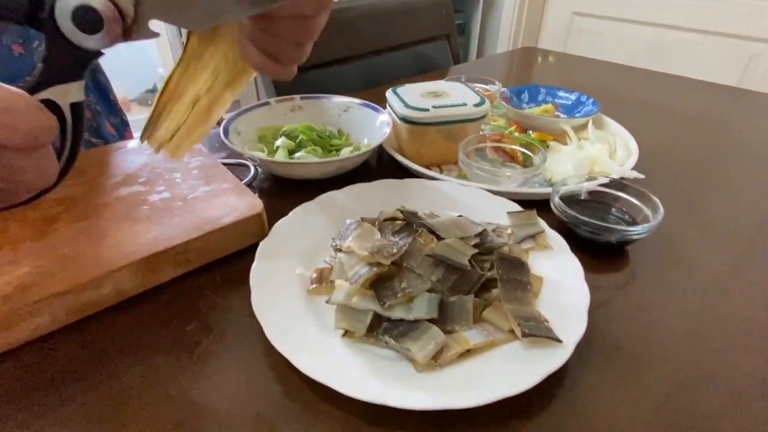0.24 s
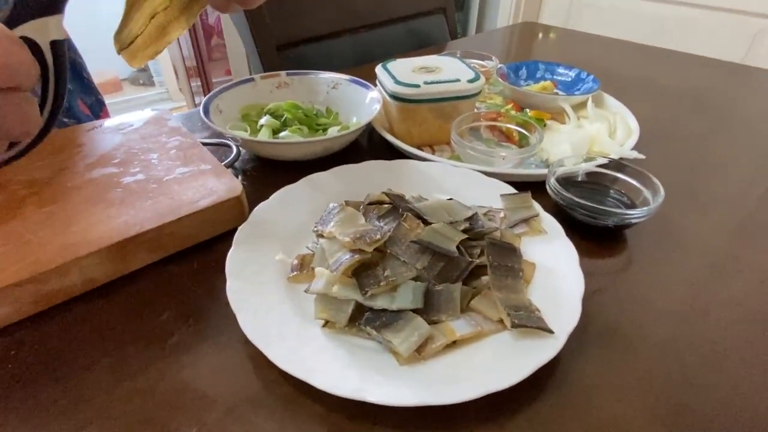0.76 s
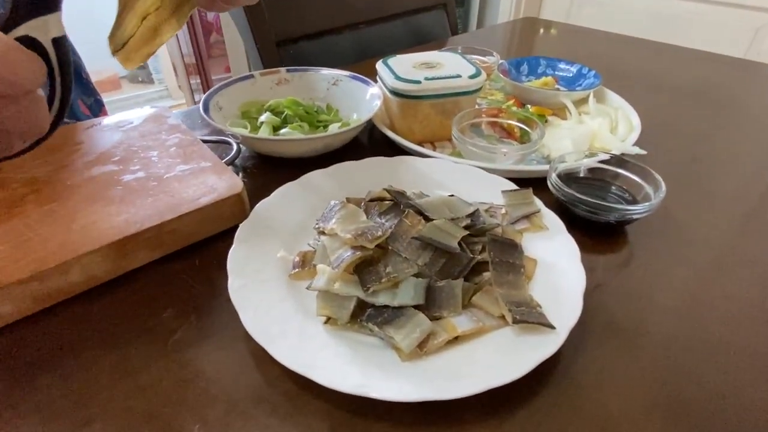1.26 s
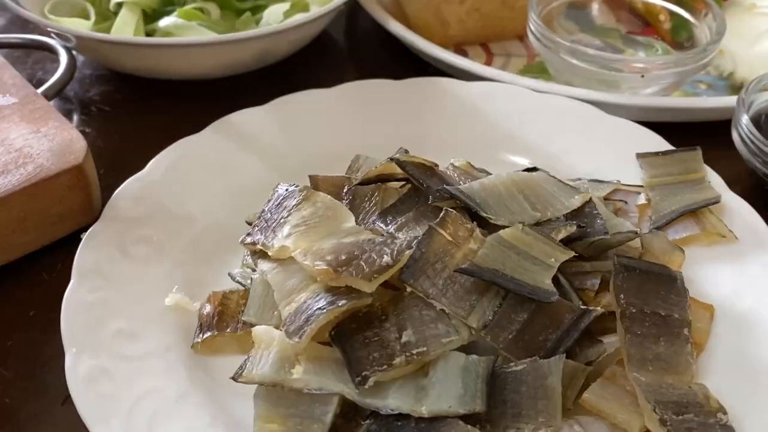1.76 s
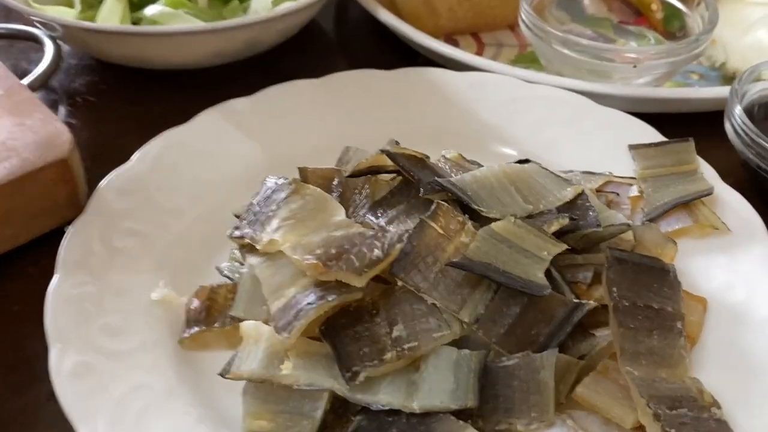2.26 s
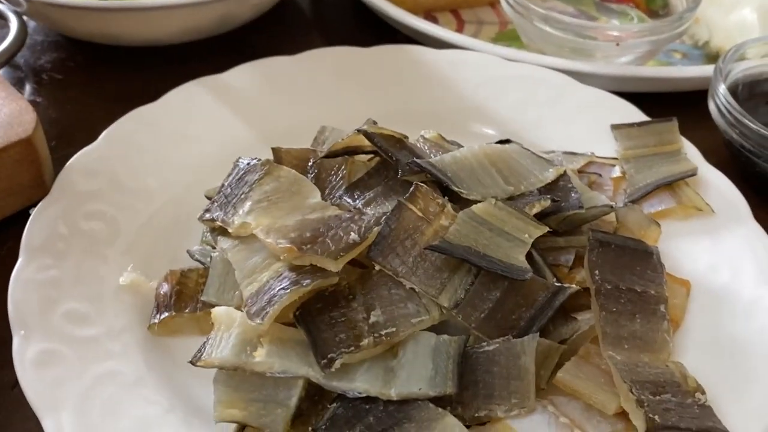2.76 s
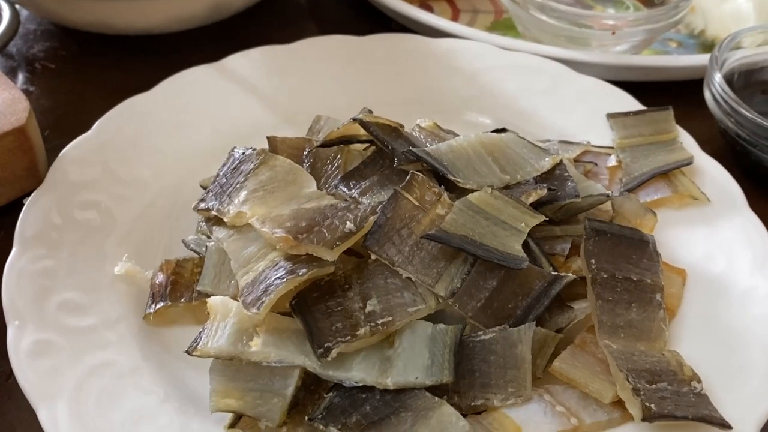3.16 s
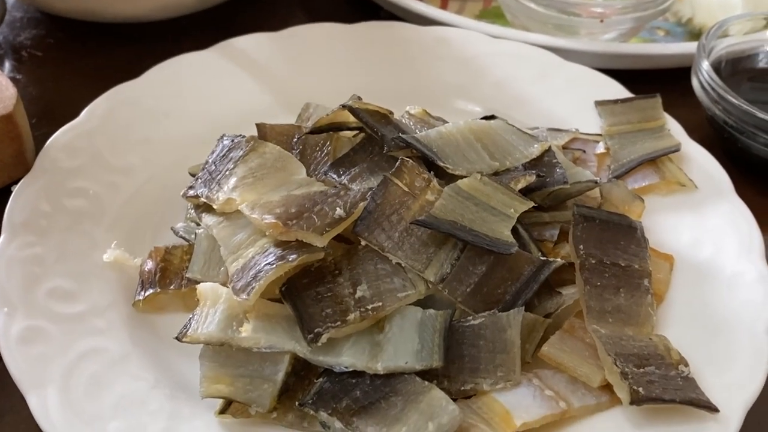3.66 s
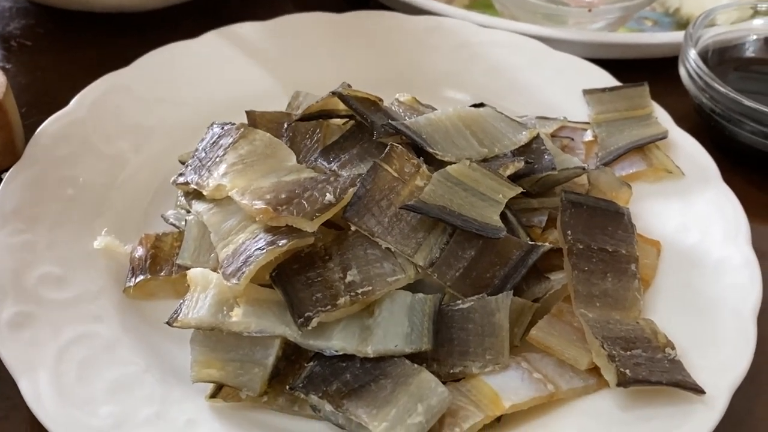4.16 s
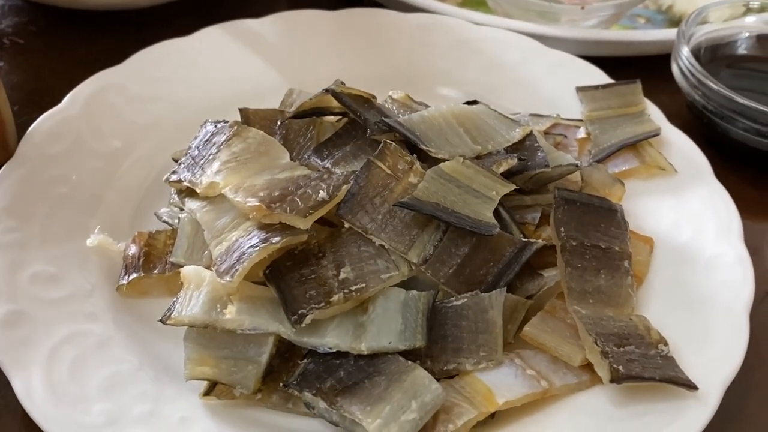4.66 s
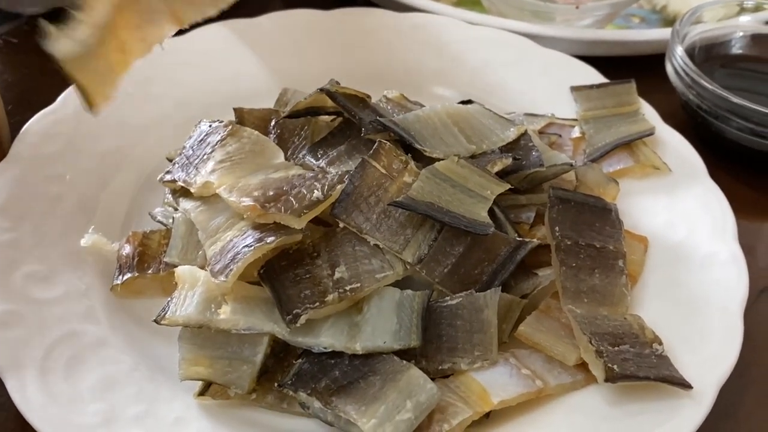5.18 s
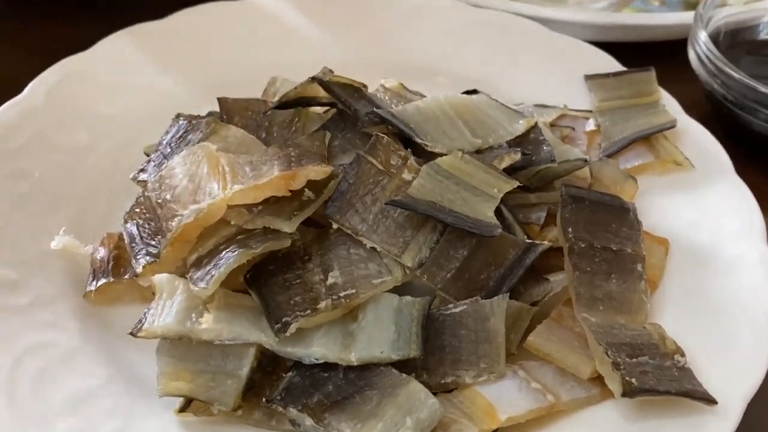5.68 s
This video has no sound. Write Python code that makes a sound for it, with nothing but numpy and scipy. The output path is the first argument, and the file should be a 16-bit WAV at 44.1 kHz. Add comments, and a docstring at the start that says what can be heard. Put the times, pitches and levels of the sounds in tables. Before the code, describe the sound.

Scissors cut dried fish with sharp snaps, steel ticks and plastic handle clacks in a small kitchen, amid dull handling thumps.

```python
"""Kitchen scissors cut tough dried fish in a small, live kitchen; an appliance hums throughout.
First, fingers bump and tap the case of the hand-held microphone, as they do on and off later.
The blades tick faintly near 1 s; from 1.5 s they rasp along each other and tick. Between 2 and 4 s
the fish gives way in five snaps, amid clacks of the shutting handles and a ping of freed steel.
More strokes and two faint pings follow; the handles clack shut a last time at 5.5 s."""
import sys
import numpy as np
from scipy import signal
from scipy.fft import rfft, irfft
from scipy.io import wavfile

SR = 44100
rng = np.random.default_rng(int(sys.argv[2]) if len(sys.argv) > 2 else 0)


def dump(signal):
    """Clip the signal to [-1, 1] and save it as 16-bit WAV at the path in sys.argv[1]."""
    limited = np.clip(np.atleast_2d(signal).T, -1, 1)
    pcm = np.round(limited * 32767).astype(np.int16)
    wavfile.write(sys.argv[1], SR, pcm)


N = 261365
TIME_S = np.arange(N) / SR
HIT_S = TIME_S[:SR // 8]
IMPULSE = HIT_S == 0

# soft bumps on the microphone case: start_s, push_db, contact_s
BUMPS = [(0.246, -10.5, 0.013), (0.45, -13, 0.007), (0.493, -9.5, 0.0068), (0.686, -4.5, 0.013),
         (0.965, -11, 0.018), (1.301, -12, 0.012), (1.784, -15.5, 0.013), (2.234, -5, 0.013),
         (2.439, -21, .005), (2.465, -16, 0.02), (3.441, -18, 0.0036), (4.571, -21, 0.013),
         (4.718, -19, 0.016), (5.221, -17, 0.015), (5.527, -18.5, 0.0079)]
# blade-on-blade strokes: start_s, length_s, rasp_db, whistle_db, start_hz, end_hz
STROKES = [(1.483, 0.16, -71, -72, 7150, 9300), (1.595, 0.12, -62.5, -65, 9400, 10760),
           (1.922, 0.21, -65, -50, 5820, 7270), (2.157, 0.22, -68.5, -85, 6650, 7600),
           (2.764, 0.2, -66.5, -67, 7300, 8400), (3.527, .24, -55.5, -55, 8570, 11700),
           (3.981, 0.26, -59.5, -52, 6400, 9200), (4.289, .06, -72, -80, 7600, 7650),
           (4.583, 0.1, -69, -60.5, 7100, 7930), (4.666, 0.16, -60.5, -53.5, 8400, 11660),
           (4.706, 0.21, -64.5, -61, 13300, 14100), (5.158, 0.075, -71, -60, 8040, 8800)]
# spectrum of grinding edges and parting skin: freq_hz, density_db
RASP_SPECTRUM = [(800, -21), (2400, -7), (4000, -19.5), (5600, -11), (8000, -14.5), (10000, -22),
                 (13000, -20), (15500, -33), (17000, -34)]
# handles shutting: start_s, level_db, treble_db, rattle_t60_s
CLACKS = [(1.794, -22.5, -2, 0.051), (2.659, -22.5, 6, 0.07), (3.4022, -22.5, 7.5, 0.036),
          (3.4274, -18.5, 1, 0.043), (5.518, -17, -1.5, 0.043)]


def amp(db):
    """Decibels to gain."""
    return 10 ** (np.asarray(db) / 20)


def rms_one(x):
    """Scale to rms 1."""
    return x / np.sqrt(np.mean(x ** 2) + 1e-20)


def peak_one(x):
    """Scale to peak 1."""
    return x / np.max(np.abs(x))


def at_hz(points, hz):
    """Read a table on a log-frequency axis."""
    freq_hz, value = np.transpose(points)
    return np.interp(np.log(np.maximum(hz, 1)), np.log(freq_hz), value)


def cut(x, hz, kind, order=2):
    """Causal Butterworth filter."""
    sos = signal.butter(order, np.minimum(hz, .48 * SR), kind, fs=SR, output="sos")
    return signal.sosfilt(sos, x + 1e-18)


def shelf(x, hz, db, kind):
    """First-order low or high shelf."""
    return x + (amp(db) - 1) * cut(x, hz, kind, order=1)


def colour(x, spectrum):
    """Filter by a table of freq_hz, gain_db."""
    return irfft(rfft(x) * amp(at_hz(spectrum, np.fft.rfftfreq(len(x), 1 / SR))), len(x))


def drift(rate_hz):
    """Random line segments, rms 1."""
    knots = rng.standard_normal(int(rate_hz * N / SR) + 2)
    return rms_one(np.interp(TIME_S * rate_hz, np.arange(len(knots)), knots))


def resonate(x, modes):
    """Parallel resonators of alternating sign: freq_hz, width_hz, gain_db."""
    out = 0
    for k, (hz, width_hz, db) in enumerate(modes):
        r = np.exp(-np.pi * width_hz / SR)
        feedback = [1, -2 * r * np.cos(2 * np.pi * hz / SR), r * r]
        out = out + (-1) ** k * amp(db) * (1 - r * r) / 2 * signal.lfilter([1, 0, -1], feedback, x + 1e-18)
    return out


def decay(t, t60_s):
    """Exponential decay."""
    return np.exp(-np.log(1000) * t / np.maximum(t60_s, 1e-3))


def contact(rattle, t60_s):
    """An impulse and a dying rattle of micro-contacts."""
    return IMPULSE + rattle * rng.standard_normal(len(HIT_S)) * decay(HIT_S, t60_s)


def add(track, start_s, sound):
    """Mix a sound in."""
    i = max(int(start_s * SR), 0)
    track[i:i + len(sound)] += sound[:N - i]


def kitchen(x, build_s):
    """Diffuse reflections build up, then die soonest in the treble."""
    spectrum = [(100, -16.5), (300, -2.5), (500, -3), (700, 0.5), (1000, 3.5), (1400, -6.5), (2500, -7),
                (4000, -3), (7000, -5), (10000, -5), (13000, -7), (16000, -14)]  # reflections: freq_hz, gain_db
    reverb_times = [(150, 0.95), (500, 0.27), (1100, 0.47), (3500, 0.42), (7000, 0.38), (14000, 0.11)]  # room decay: freq_hz, t60_s
    t = TIME_S[:int(.7 * SR)]
    bins = rfft(colour(rng.standard_normal(len(t)), spectrum))
    hz = np.fft.rfftfreq(len(t), 1 / SR)
    edges_hz = np.geomspace(60, SR / 2, 16)
    tail = 0
    for low, high in zip(edges_hz, edges_hz[1:]):
        band = irfft(bins * (hz >= low) * (hz < high), len(t))
        tail += band * decay(t, at_hz(reverb_times, np.sqrt(low * high)))
    return signal.fftconvolve(x, tail * (1 - np.exp(-t / build_s)))[:N] * amp(-35)


def room_air():
    """Steady low room noise and a faint hiss."""
    air_spectrum = [(59, -60.5), (100, -8), (174, 0.5), (298, -3.5), (329, -1), (359, -4.5), (397, -4),
                    (510, -12), (578, -9.5), (647, -15), (707, -16), (791, -6.5), (2000, -26.5),
                    (2600, -62), (4400, -120)]  # room noise: freq_hz, density_db
    hiss_spectrum = [(1500, 1), (2100, -3.5), (2700, -5.5), (3600, -7.5), (4600, -10.5), (5400, -8),
                     (6300, -18.5), (7600, -12.5), (9000, -22), (13000, -18), (16000, -53.5)]  # hiss: freq_hz, density_db
    air = colour(rng.standard_normal(N), air_spectrum)
    air = cut(cut(air, 80, "high"), 1400, "low", order=4)
    hiss = colour(rng.standard_normal(N), hiss_spectrum)
    return amp(-57.5) * rms_one(air) + amp(-72.5) * rms_one(hiss)


def appliance_hum():
    """Four tones, each wavering in phase."""
    tones = [(329, -65.5), (405, -71), (571.5, -67), (695, -70)]  # hum partials: pitch_hz, rms_db
    return sum(amp(db) * np.sqrt(2) * np.sin(2 * np.pi * hz * TIME_S + 0.53 * drift(6.4))
               for hz, db in tones)


def hand_rumble():
    """The holding hand never rests, and takes a moment to settle after each bump."""
    unrest = [(0.0, -35), (0.48, -38), (1.1, -50), (1.68, -40), (2.23, -30), (4.16, -40), (5.64, -41.5),
              (5.93, -48)]  # rumble envelope: time_s, level_db
    spectrum = [(12, 3), (25, 2.5), (45, -4), (70, -11), (100, -26.5), (200, -38.5)]  # handling noise: freq_hz, density_db
    level = amp(np.interp(TIME_S, *np.transpose(unrest)) + 1)
    for start_s, push_db, _ in BUMPS:
        add(level, start_s, amp(push_db - 21) * decay(TIME_S[:SR], t60_s=0.44))
    return cut(level * rms_one(colour(rng.standard_normal(N), spectrum)), 310, "low", order=4)


def case_bumps():
    """A soft push swings the case slowly and stirs its low modes; longer contacts ring less."""
    case_modes = [(66, 34, 11.5), (111, 32, 6), (161.5, 33.5, 17.5), (358, 75, 1)]  # microphone case: freq_hz, width_hz, gain_db
    soften_db_per_s = 501
    out, t = np.zeros(N), TIME_S[:SR // 3]
    for start_s, push_db, contact_s in BUMPS:
        push = np.sin(np.pi * np.minimum(t / contact_s, 1)) ** 2
        swing = peak_one(resonate(push, [(23.96, 10.4, 5.5), (70.3, 17.6, -1.5), (142, 100, -15.5)]))
        stir = rng.standard_normal(len(t)) * decay(t, t60_s=0.081)
        ring = peak_one(cut(resonate(stir, case_modes), 850, "low"))
        add(out, start_s, amp(push_db - 2.5) * (swing + amp(-11 - soften_db_per_s * contact_s) * ring))
    return out


def finger_taps():
    """Fingers click dryly on the case with a short, hollow ring near 1 kHz."""
    taps = [(0.2577, -33.5, -6), (.491, -35, -16.5), (.499, -30, -21), (0.511, -33.5, -17.5),
            (.685, -35, -31), (0.703, -41, -13), (.9665, -33.5, -5), (1.004, -38.5, -17), (1.305, -27, -13),
            (1.940, -30, -2.5), (2.240, -40.5, -5), (4.615, -45.5, 15)]  # finger clicks: start_s, peak_db, treble_db
    shell_modes = [(1, 260, 0), (1.25, 400, -8), (2.2, 1200, -14), (4.1, 1800, -14)]  # tapped case: pitch_ratio, width_hz, gain_db
    out = np.zeros(N)
    for start_s, peak_db, treble_db in taps:
        pitch_hz = 966 * (1 + 0.077 * rng.standard_normal())
        modes = [(pitch_hz * ratio, width_hz, db) for ratio, width_hz, db in shell_modes]
        click = resonate(contact(rattle=0.046, t60_s=0.035), modes)
        treble = cut(cut(click, 1600, "high"), 6400, "low", order=4)
        add(out, start_s, amp(peak_db) * peak_one(cut(click, 1400, "low") + amp(treble_db - 6) * treble))
    return out


def closing(time_s, start_s, length_s):
    """Blade speed and travel, both 0-1, in a stroke that speeds up and slows again."""
    angle = np.pi * np.clip((time_s - start_s) / length_s, 0, 1)
    return np.abs(np.sin(angle)), (1 - np.cos(angle)) / 2


def blade_hz(time_s):
    """Blade pitch, rising with the travel of the nearest stroke."""
    nearest = min(STROKES, key=lambda row: abs(row[0] + row[1] / 2 - time_s))
    start_s, length_s, _, _, start_hz, end_hz = nearest
    return start_hz + (end_hz - start_hz) * closing(time_s, start_s, length_s)[1]


def blade_rasp():
    """Edges grind in tiny slips; a rough whistle rises as the crossing point runs to the tips."""
    grind, whistle = np.zeros((2, N))
    slips = amp(4 * drift(450))
    grains = rms_one(colour(rng.standard_normal(N) * slips, RASP_SPECTRUM))
    roughness = rms_one(cut(rng.standard_normal(N) * slips, 600, "low"))
    for start_s, length_s, rasp_db, whistle_db, start_hz, end_hz in STROKES:
        speed, travel = closing(TIME_S, start_s, length_s)
        level = speed ** 2.2
        wander_hz = 330 * drift(45)  # stick and slip
        pitch_hz = start_hz + (end_hz - start_hz) * travel + wander_hz
        grind += amp(rasp_db) * level * grains
        whistle += amp(whistle_db) * level * roughness * np.sin(2 * np.pi * np.cumsum(pitch_hz) / SR)
    return (grind + whistle) * amp(2.5 * drift(90) - 3.5)


def blade_ticks():
    """An edge catches and slips: a bright click, and a brief ring pitched by where the blades cross."""
    hard_catches = [(.927, -52), (.994, -43), (1.97, -43), (1.9783, -32.5), (2.0196, -29.5), (2.034, -38),
                    (2.0623, -33), (2.2784, -51), (2.4213, -47.5), (2.866, -39.5), (2.9308, -44),
                    (3.087, -51), (3.4265, -44), (4.024, -43), (4.0621, -46), (4.093, -37), (4.125, -44),
                    (4.1355, -34.5), (4.99, -52.5), (5.208, -35), (5.23, -32.5), (5.878, -36.5)]  # steel edges catching: start_s, level_db
    pressed_modes = [(.37, 600, -15), (.7, 900, -6), (1, 1300, 0), (1.5, 3000, -10)]  # blades pressed together: pitch_ratio, width_hz, gain_db
    faint_catches = [(start_s + length_s * rng.beta(2, 2), rasp_db + 13 + rng.standard_normal())
                     for start_s, length_s, rasp_db, *_ in STROKES for _ in range(3)]
    direct, to_room = np.zeros((2, N))
    for start_s, level_db in hard_catches + faint_catches:
        slip = contact(rattle=0.9, t60_s=0.0098)
        modes = [(blade_hz(start_s) * ratio, width_hz, db) for ratio, width_hz, db in pressed_modes]
        click = peak_one(cut(cut(slip, 4970, "high"), 6260, "low"))
        ring = amp(-15.5) * peak_one(resonate(slip, modes))
        add(direct, start_s, amp(level_db) * (click + ring))
        add(to_room, start_s, amp(level_db) * (amp(-3) * click + amp(-0.5) * ring))
    return direct, to_room


def blade_pings():
    """The blades spring free with a click and ring."""
    pings = [(3.171, -19, -14.5), (4.18, -35.5, -11), (4.363, -43.5, -8)]  # blade releases: start_s, level_db, click_db
    free_modes = [(2550, 250, -9), (5100, 1200, -13), (6700, 380, 2), (7250, 400, -2)]  # free blades: freq_hz, width_hz, gain_db
    direct, to_room = np.zeros((2, N))
    ring = peak_one(resonate(IMPULSE, free_modes))
    for start_s, level_db, click_db in pings:
        click = amp(click_db) * peak_one(cut(contact(rattle=0.7, t60_s=0.021), [2500, 12000], "band"))
        add(direct, start_s, amp(level_db) * (click + ring))
        add(to_room, start_s, amp(level_db) * (amp(-1) * click + amp(1.5) * ring))
    return direct, to_room


def handles(force, q=3.5):
    """Response of the heavily damped plastic handles, peak 1."""
    modes = [(180, -1.5), (450, 2.5), (820, 3), (1080, 3), (1650, -0.5), (2200, -2), (2850, -5),
             (4600, -13), (6800, -21.5), (11500, -34.5)]  # handle resonances: freq_hz, gain_db
    return peak_one(cut(resonate(force, [(hz, hz / q, db) for hz, db in modes]), 6300, "low"))


def handle_clacks():
    """The handles meet and chatter; a longer chatter feeds the room more."""
    direct, to_room = np.zeros((2, N))
    body = handles(IMPULSE)
    for start_s, level_db, treble_db, t60_s in CLACKS:
        knock = handles(contact(rattle=0.45, t60_s=t60_s))
        radiated = amp(8.5) * (t60_s / 0.061) ** 0.33 * body
        for track, sound in (direct, knock), (to_room, radiated):
            warmed = shelf(sound, 1100, 1.2, "low")
            add(track, start_s, amp(level_db) * shelf(warmed, 3750, treble_db, "high"))
    return direct, to_room


def fish_bites():
    """Fibres part in a dense burst, bright in the skin, dull in the flesh; each clack crushes a few."""
    bites = [(1.914, 0.045, -60), (2.723, 0.037, -53.5), (5.217, 0.041, -47)]  # blades entering tough skin: start_s, length_s, level_db
    crushes = [(start_s, 0.044, level_db - 36) for start_s, level_db, *_ in CLACKS]
    out = np.zeros(N)
    for start_s, length_s, level_db in bites + crushes:
        fibres = rng.standard_normal(len(HIT_S)) * amp(11.5 * rng.standard_normal(len(HIT_S)))
        skin = rms_one(colour(fibres, RASP_SPECTRUM))
        flesh = amp(-2) * rms_one(resonate(fibres, [(870, 230, 0)]))
        envelope = np.sin(np.pi * np.minimum(HIT_S / length_s, 1))
        add(out, start_s, amp(level_db) * (skin + flesh) * envelope)
    return out


def fish_snaps():
    """A fracture is one short pulse; its jolt knocks the handles, which sound into the room."""
    snaps = [(2.012, -18.5, -2), (2.277, -23.5, -33), (2.614, -21.5, -8), (3.352, -15.5, 3.5),
             (3.942, -20, 2)]  # fish giving way: start_s, level_db, treble_db
    direct, to_room = np.zeros((2, N))
    body = peak_one(cut(handles(IMPULSE), 3000, "low", order=1))
    for start_s, level_db, treble_db in snaps:
        fracture = contact(rattle=0.043, t60_s=0.016)
        crack = cut(cut(fracture, 1680, "high"), 3620, "low", order=6)
        crack = shelf(peak_one(crack), 2800, treble_db, "high")
        knock = handles(contact(rattle=0.21, t60_s=0.064))
        add(direct, start_s, amp(level_db) * (crack + amp(-11) * knock))
        add(to_room, start_s, amp(level_db) * (amp(-11) * crack + amp(2.5) * body))
    return direct, to_room


def scene():
    """The scissors sound directly and through the room; the case noises stay nearly dry."""
    direct, to_room = np.sum([fish_snaps(), handle_clacks(), blade_ticks(), blade_pings()], axis=0)
    cutting = blade_rasp() + fish_bites()
    fingers = finger_taps()
    room = kitchen(to_room + amp(3.5) * cutting + amp(-14.5) * fingers, build_s=0.00022)
    bumps = case_bumps()
    background = room_air() + appliance_hum() + hand_rumble()
    return (direct + cutting + fingers + room + bumps + background)[None]


def record(dry):
    """Steep elliptic low-pass."""
    cutoff_hz = 16300
    return signal.sosfilt(signal.ellip(10, .2, 80, cutoff_hz, fs=SR, output="sos"), dry)


dry = scene()
out = record(dry)
dump(out)
```